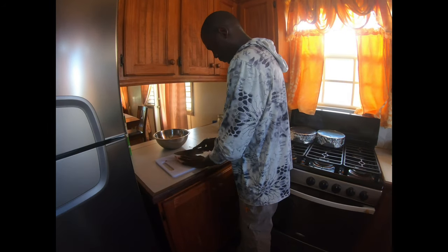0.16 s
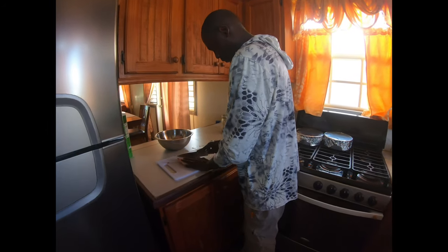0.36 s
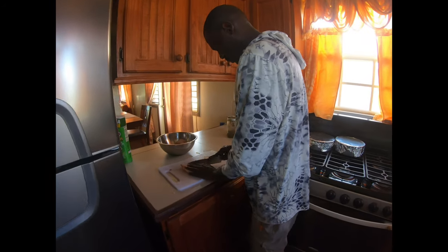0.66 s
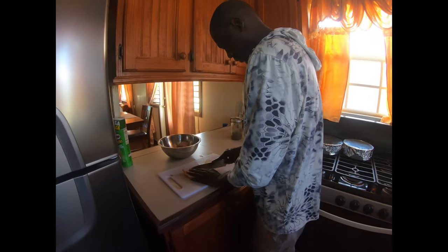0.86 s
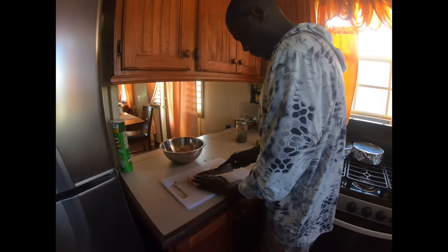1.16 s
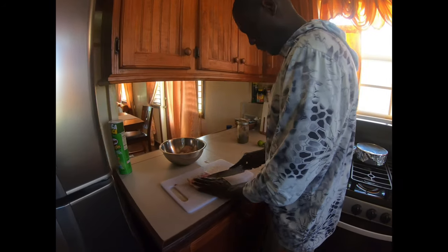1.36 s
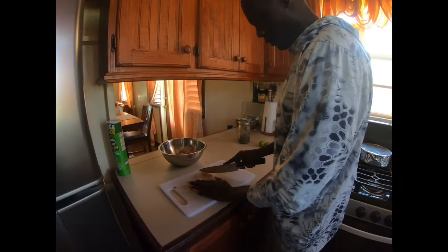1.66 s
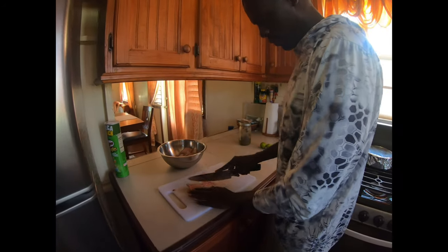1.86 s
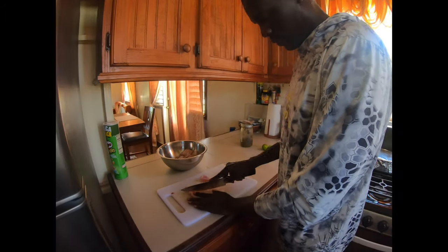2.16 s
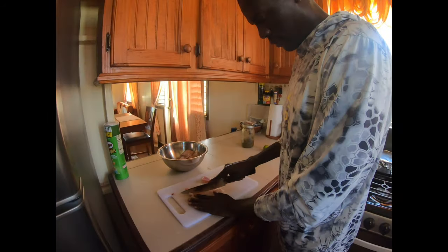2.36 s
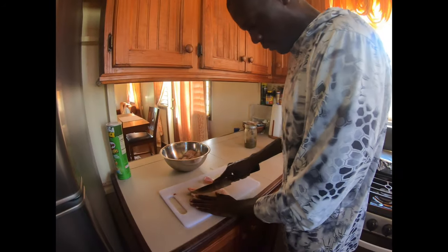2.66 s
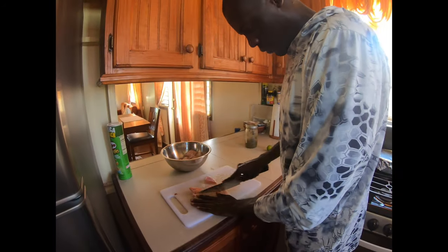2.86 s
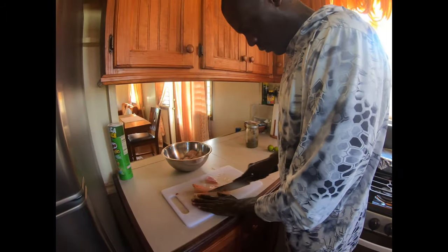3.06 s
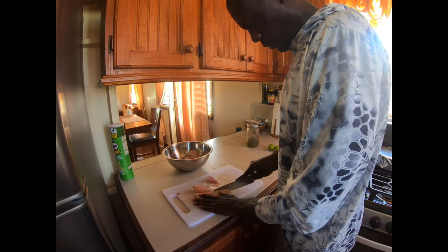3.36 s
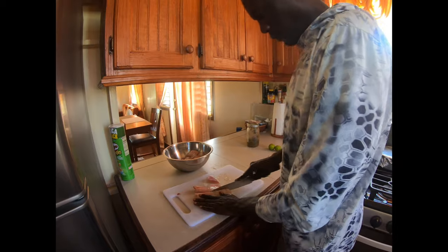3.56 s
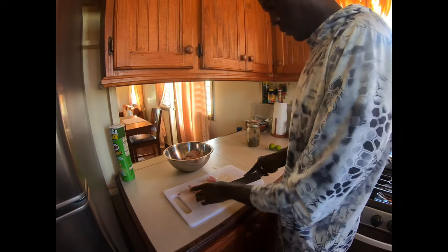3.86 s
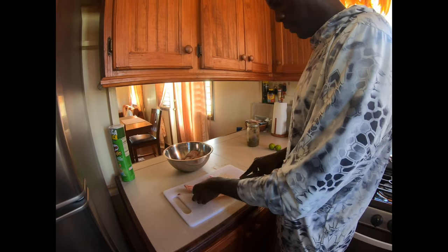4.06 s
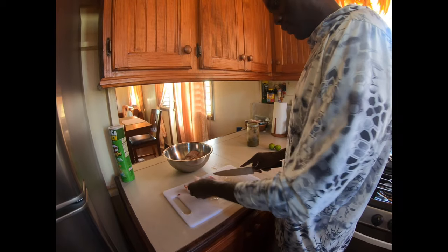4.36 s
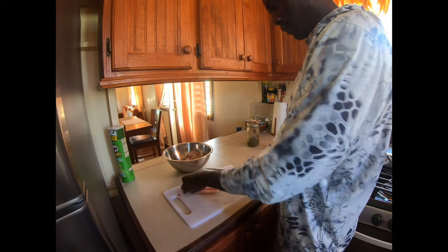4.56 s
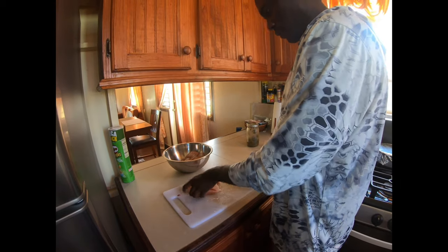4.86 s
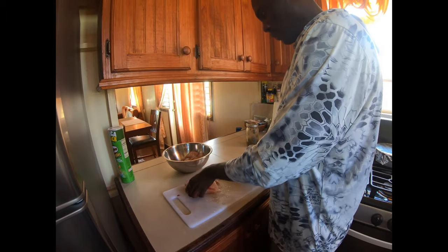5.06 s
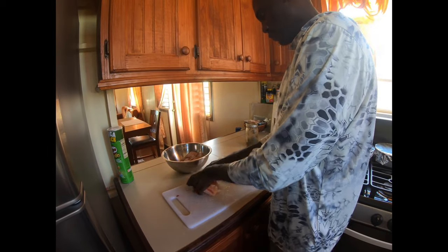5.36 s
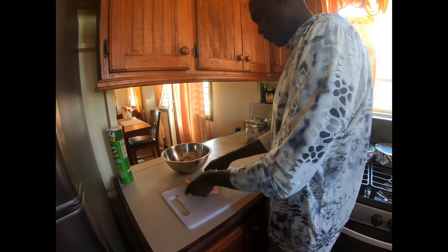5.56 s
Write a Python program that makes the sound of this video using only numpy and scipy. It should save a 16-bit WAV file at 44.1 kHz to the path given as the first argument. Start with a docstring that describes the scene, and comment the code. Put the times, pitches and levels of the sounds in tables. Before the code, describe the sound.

A low, slightly wavering fridge hum with soft air and faint thin hiss runs throughout, swelling during the first second or two as the carried microphone comes closer, with soft low handling bumps. A tiny squeak opens the scene, then a knife rasps through fish in short gritty strokes. Dull plastic-board taps land at about 0.8, 1.5 and 1.9 seconds, with a wet smack near 1.2. From 2.4 to 4 seconds the strokes come more closely, with a faint tap, small bone snaps and a crisp crunch around 3.1, and another strong rasp near 3.6. It then quiets, with a small moist tick at 4.6. Light steel clinks start at 4.85; at 5.07 the knife drops on the counter with the loudest, booming knock, bounces, jangles and skids, stopping by 5.2. A soft tap comes at 5.55. Short kitchen reflections surround the knife work.

```python
"""Slicing fish in a small kitchen

Fish is sliced on a plastic board while a fridge hums: a wavering tone with soft air noise and thin hiss.
The blade rasps through the flesh (clumps of tiny clicks), snaps small bones, smacks and taps the board
(short noise bursts and dying tones). Then the knife is put down: it clinks, drops on the counter
with a knock and skids a little. Echoes of the kitchen are added to all of the knife work."""
import sys
import numpy as np
from scipy import signal
from scipy.fft import rfft, irfft
from scipy.io import wavfile
from scipy.ndimage import uniform_filter1d

SR = 44100
rng = np.random.default_rng(int(sys.argv[2]) if len(sys.argv) > 2 else 0)


def generate_wav(signal):
    """Clip the signal to [-1, 1] and save it as 16-bit WAV at the path in sys.argv[1]."""
    frames = np.transpose(np.atleast_2d(signal))
    scaled = np.clip(frames, -1, 1) * 32767
    pcm = np.round(scaled).astype(np.int16)
    wavfile.write(sys.argv[1], SR, pcm)


N = 251811
TIME = np.arange(N) / SR
HIT_TIME = TIME[:SR // 2]  # every single hit lasts half a second


def amp(db):
    """Turns decibels into gain."""
    return 10 ** (np.asarray(db) / 20)


def evened(x):
    """Scales a steady sound to rms 1."""
    return x / np.sqrt(np.mean(x ** 2) + 1e-20)


def sized(x):
    """Scales a hit to the energy of a fortieth of a second at rms 1."""
    return x / np.sqrt(np.sum(x ** 2) * 40 / SR + 1e-20)


def read(points, hz):
    """Reads a curve between its points, on a log-frequency axis."""
    point_hz, value = np.transpose(points)
    return np.interp(np.log(hz + 1), np.log(point_hz), value)


def add(mix, start_s, sound):
    """Mixes a sound in at a time."""
    part = mix[round(start_s * SR):][:len(sound)]
    part += sound[:len(part)]


def causal(log_gain):
    """The minimum-phase spectrum with these log gains: it never sounds ahead of its cause."""
    return np.exp(np.conj(signal.hilbert(log_gain)))


def colour(x, points, tilt_db=0):
    """Filters a sound to a spectrum, tilted about 2 kHz by some dB per octave (level below 300 Hz)."""
    hz = abs(np.fft.fftfreq(4096, 1 / SR))
    gain_db = read(points, hz) + tilt_db * np.log2(np.maximum(hz, 300) / 2000)
    taps = np.fft.ifft(causal(np.log(amp(gain_db)))).real
    return signal.oaconvolve(x, taps[:len(taps) // 2])[:len(x)]


def neutral(x):
    """Keeps a burst's scatter in time but takes out its broad peaks and dips in pitch."""
    spectrum = np.fft.fft(x)
    power = uniform_filter1d(abs(spectrum) ** 2, size=25, mode="wrap")
    flatten = causal(-np.log(power + 1e-9 * power.max()) / 2)
    return sized(np.fft.ifft(spectrum * flatten).real)


def resonate(x, hz, width):
    """One resonance of some width in Hz, at rms 1."""
    pole = np.exp((2j * np.pi * hz - np.pi * abs(width)) / SR)
    return evened(signal.lfilter([1], [1, -pole], x).real)


def sweep(x, hz, width):
    """A broad resonance (two equal poles) that follows a pitch curve, at rms 1."""
    turn = np.exp(2j * np.pi * np.cumsum(hz) / SR)
    r = np.exp(-np.pi * abs(width) / SR)
    return evened((turn * signal.lfilter([1], np.poly([r, r]), x / turn)).real)


def drift(per_s):
    """Slow chance of rms 1, with no change faster than per_s cycles a second."""
    slow = np.fft.rfftfreq(N, 1 / SR) < per_s
    return evened(irfft(rfft(rng.standard_normal(N)) * slow, N))


def grains(per_s, spread_db, clump_db):
    """Stick-slip friction: tiny clicks of uneven size, louder and softer in clumps."""
    size = amp(spread_db * np.minimum(rng.exponential(1, N), 4) + clump_db * drift(60))
    return size * rng.choice([-1., 1.], N) * (rng.random(N) < per_s / SR)


def contact(t60, sharp, rise_s=0.00043):
    """Two things touch: a first sharp click and the brief chatter after it."""
    swell = 1 - np.exp(-HIT_TIME / rise_s)
    chatter = rng.standard_normal(len(HIT_TIME)) * swell * amp(-60 * HIT_TIME / t60)
    return neutral(sized(chatter) + sharp * sized(1. * (HIT_TIME == 0)))


def ring(modes):
    """The tones (modes) of a struck object; each dies away by 60 dB in its own t60."""
    tones = 0
    for hz, db, t60 in modes:
        fade = amp(db - 60 * HIT_TIME / t60)
        tones = tones + fade * np.sin(2 * np.pi * hz * HIT_TIME) * rng.choice([-1, 1])
    return sized(tones)


# how unlike left and right are: (frequency [Hz], side level against middle [dB])
STEREO_WIDTH = [(40, -14), (125, -8.5), (250, -17), (500, -9), (1000, -1.5), (2000, -5), (4000, -8),
                (8000, 0.5), (14000, -2)]


def pair(mid, side):
    """Two close ears: fairly alike in the bass, less alike in much of the treble."""
    width = amp(read(STEREO_WIDTH, np.fft.rfftfreq(len(side), 1 / SR)))
    side = irfft(rfft(side) * width, len(side))
    return np.array([mid + side, mid - side])


# how long the room rings: (frequency [Hz], time to die by 60 dB [s])
ROOM_RINGING = [(100, 0.32), (500, 0.21), (1400, 0.4), (3700, 0.26), (8000, 0.27), (14000, 0.19)]


def kitchen(x, wet_db, early_db, early_t60=0.058):
    """Direct sound, quick echoes from counter and cupboards, and a short tail that dies by frequency."""
    t = HIT_TIME
    shape = (2, len(t))
    echoes = rng.choice([-1., 1.], shape) * (rng.random(shape) < 3000 / SR) * (t > .0015)
    hz, age, z = signal.stft(echoes, SR, nperseg=256)
    fade = amp(-60 * age / read(ROOM_RINGING, hz)[:, None])
    tail = signal.istft(z * fade, SR, nperseg=256)[1][:, :len(t)]
    early = echoes * amp(-60 * t / early_t60)
    swell = np.minimum(t / 0.0026, 1)
    mid, side = [amp(wet_db) * sized(a * swell) + amp(early_db) * sized(b) for a, b in zip(tail, early)]
    mid = neutral(mid + sized(1. * (t == 0)))  # the direct sound is the single click at 0
    response = pair(mid, neutral(side)) / np.linalg.norm(mid)
    return signal.fftconvolve(x[None], response, axes=1)[:, :N]


# steady air of the kitchen: (frequency [Hz], relative level per Hz [dB])
AIR_COLOUR = [(20, -18.5), (42, -5), (70, -10), (115, -18), (155, 3), (215, -1.5), (260, -5), (380, -9.5),
              (520, -14), (1200, -20), (2200, -25), (4200, -30.5), (5500, -37.5), (8000, -41),
              (11000, -52.5), (15000, -63)]
# thin hiss of the fridge: (frequency [Hz], width of each of two filter passes [Hz], level at the start [dB])
HISS_BANDS = [(3750, 28, -74.5), (3820, 290, -91), (7050, 280, -78)]
AIR_DB = -53
HUM_HZ, HUM_DB = 196.7, -49.5  # the hum from near
HUM_FAR_DB, APPROACH_S = -14, 0.71  # how much weaker at first; time constant of the microphone coming closer


def fridge(waver=0.16, hiss_fade_db=-4):
    """A wavering hum that grows as the microphone comes near, soft air noise, and a thin hiss that fades."""
    hum = np.sqrt(2) * np.sin(2 * np.pi * HUM_HZ * TIME + waver * drift(5.8)) * (1 + waver * drift(3.7))
    hum *= amp(HUM_DB + HUM_FAR_DB * np.exp(-TIME / APPROACH_S))
    noise = rng.standard_normal((2, N))
    air = np.array([amp(AIR_DB) * evened(colour(z, AIR_COLOUR)) for z in noise])
    hiss = np.array([sum(amp(db) * resonate(resonate(z, hz, width), hz, width)
                         for hz, width, db in HISS_BANDS) for z in noise])
    return hum + pair(*(air + hiss * amp(hiss_fade_db * TIME / TIME[-1])))


# handling noise: (frequency [Hz], relative level per Hz [dB])
RUMBLE_COLOUR = [(20, -9), (42, 16), (70, -3.5), (110, -12), (250, -39), (1000, -79)]


def rumble(db=-66):
    """Soft uneven bumping of the carried microphone: low noise that swells at random."""
    swell = amp(3 * np.tanh(drift(5)))
    noise = rng.standard_normal((2, N))
    return amp(db) * swell * pair(*[evened(colour(z, RUMBLE_COLOUR)) for z in noise])


SWELL_CYCLES = 7.6  # time constant of a panel's swelling, in cycles of its tone


def panel(hz, t60, spread=0.132):
    """A panel swells up, the lower the slower, and dies as a cluster of close modes."""
    cluster = ring([(hz, 0, t60), (hz * (1 + spread), -7, t60), (hz * (1 - spread), -8, t60)])
    return sized(cluster * (1 - np.exp(-HIT_TIME * hz / SWELL_CYCLES)))


# cabinet under the counter, shaken by the drop: (frequency [Hz], level [dB], time to die by 60 dB [s])
CABINET_PANELS = [(40.7, -37.5, 0.36), (82.8, -37, 0.34), (112.5, -28.5, 0.4), (133.2, -27.5, 0.37),
                  (190, -28, 0.54), (291.3, -32, 0.11), (376, -34, 0.16)]
# soft low bumps as the microphone is carried: (time [s], level [dB])
MICROPHONE_BUMPS = [(.14, -45.5), (1.284, -48), (4.627, -44)]
DROP_S = 5.076  # when the knife's weight lands
TAP_THUD_DB, TAP_THUD_HZ, TAP_THUD_T60_S = -21, 109, 0.33  # counter under the board, dB against the tap
BUMP_HZ, BUMP_T60_S = 46, 0.084


def thuds():
    """The counter answers each tap, the cabinet booms under the dropped knife, the microphone is bumped."""
    out = np.zeros(N)
    for s, db, tilt_db in BOARD_TAPS:
        add(out, s, amp(db + TAP_THUD_DB) * panel(TAP_THUD_HZ, TAP_THUD_T60_S))
    add(out, DROP_S, sum(amp(db) * panel(hz, t60) for hz, db, t60 in CABINET_PANELS))
    for s, db in MICROPHONE_BUMPS:
        add(out, s, amp(db) * panel(BUMP_HZ, BUMP_T60_S))
    return out


# the hardest blow chatters this long; each step this much softer chatters twice as long
HARD_T60_S, SOFTER_DB = .011, 8.5


def knocks(blows, spectrum, modes, sharp, ring_db):
    """Hard blows: a crack of contact, longer for softer blows, and the ringing of what was struck."""
    out = np.zeros(N)
    hardest_db = max(db for s, db, tilt_db in blows)
    for s, db, tilt_db in blows:
        t60 = HARD_T60_S * 2 ** ((hardest_db - db) / SOFTER_DB)
        crack = sized(colour(contact(t60, sharp), spectrum, tilt_db))
        add(out, s, amp(db) * (crack + amp(ring_db) * ring(modes)))
    return out


# the blade touches down lightly: (time [s], level [dB], brightness [dB per octave])
KNIFE_CLINKS = [(4.8542, -39, 0.5), (4.8595, -37, 0.5), (4.930, -48.5, -5), (4.938, -54, -4),
                (4.950, -49, -1.5), (4.961, -49, -2.5)]
# sound of that contact: (frequency [Hz], relative level per Hz [dB])
CLINK_SPECTRUM = [(200, -4), (650, 2), (1000, -2.5), (1900, 2), (2700, 2), (3800, -6), (4800, -21),
                  (5650, -9.5), (6200, -28), (8000, -32), (10000, -56), (12000, -65)]
# the knife's ringing: (frequency [Hz], relative level [dB], time to die by 60 dB [s])
STEEL_MODES = [(952, 6.5, 0.079), (975, 9, 0.053), (1180, 5, 0.064), (1450, -5, 0.051), (1740, 5.5, 0.033),
               (1945, 5, 0.045), (2436, 0, 0.051), (2603, 3, 0.049), (2740, 2, 0.063), (2950, 0, 0.055),
               (3570, 4, 0.065), (3710, -3, 0.11), (4380, -5, 0.1), (5020, -21, .15), (5450, -9.5, 0.11),
               (5640, -8, 0.039), (6620, -21, 0.15), (7060, -17.5, 0.12), (7750, -19, 0.19),
               (8840, -26, 0.11), (10000, -33, 0.12)]


def clinks():
    """The blade clinks lightly down and its steel rings."""
    return knocks(KNIFE_CLINKS, CLINK_SPECTRUM, STEEL_MODES, sharp=0.41, ring_db=0)


# the knife drops flat and bounces: (time [s], level [dB], brightness [dB per octave])
DROP_BOUNCES = [(5.066, -40.5, -3.5), (5.0726, -28.5, 2), (5.0743, -23, 2), (5.079, -35.5, 1.5),
                (5.095, -34, -8), (5.107, -34.5, -10.5), (5.1161, -34.5, 1), (5.122, -37.5, -2.5),
                (5.152, -36, 9), (5.159, -37.5, 3.5), (5.1811, -37, 9), (5.206, -42, 11.5)]
# sound of that contact: (frequency [Hz], relative level per Hz [dB])
DROP_SPECTRUM = [(100, -4), (300, 7), (600, 2.5), (1100, 9), (2200, 1.5), (3100, -2), (4000, -4),
                 (4900, -13), (5700, -12.5), (6600, -19), (8000, -27), (10000, -57), (11000, -51),
                 (15000, -61)]
# knife and counter ringing together: (frequency [Hz], relative level [dB], time to die by 60 dB [s])
COUNTER_MODES = [(373, 1, 0.2), (528, 1.5, 0.17), (630, -3.5, 0.12), (760, 0, 0.19), (916, -18, 0.17),
                 (1075, 6.5, 0.12), (1115, 2.5, 0.13), (1258, -2, .18), (1543, -2, 0.1), (1660, -9, 0.17),
                 (2153, 3, 0.16), (2350, -9, 0.11), (2610, -9, 0.088), (2960, -16, .14), (3750, -7, 0.13),
                 (4480, -11, .12), (5160, -22, 0.12)]


def drop():
    """The knife drops flat and bounces; knife and counter ring together."""
    return knocks(DROP_BOUNCES, DROP_SPECTRUM, COUNTER_MODES, sharp=0.53, ring_db=-6.5)


BOUNCE_RING_DB, BOUNCE_RING_TILT = -18.5, 1.29  # dB against the blow; dB more per dB per octave of brightness
BOUNCE_RING_FALL_DB = 9  # higher modes are this much weaker per octave


def jangle(t60_stretch=0.81):
    """Each bounce rings the loose blade, brighter blows more; the tones die a little faster than in the skid."""
    out = np.zeros(N)
    modes = []
    for hz, width, db in BLADE_MODES:
        fall_db = BOUNCE_RING_FALL_DB * np.log2(hz / BLADE_MODES[0][0])
        t60 = t60_stretch * np.log(1000) / (np.pi * width)  # a narrow resonance rings long
        modes.append((hz, db - fall_db, t60))
    for s, db, tilt_db in DROP_BOUNCES:
        add(out, s, amp(db + BOUNCE_RING_DB + BOUNCE_RING_TILT * tilt_db) * ring(modes))
    return out


# scrape of the knife lying dull: (frequency [Hz], relative level per Hz [dB])
DULL_SCRAPE = [(80, -5), (200, -13), (520, 17), (1100, 2), (2500, -17), (4500, -13), (8000, -37),
               (15000, -60)]
# scrape of its edge: (frequency [Hz], relative level per Hz [dB])
KEEN_SCRAPE = [(500, 10), (1500, 2), (3700, -4), (5500, 3), (8200, 2.5), (10200, -3.5), (11000, -20),
               (14000, -16), (15000, -37)]
# whining of the loose blade: (frequency [Hz], width [Hz], relative level [dB])
BLADE_MODES = [(2480, 44, -1), (3755, 25, 3.5), (4480, 46, 3), (5060, 37, -2), (5330, 50, -5),
               (5440, 37, 4.5), (6250, 79, -10), (6650, 31, -1), (6970, 94, 1), (7700, 31, -2.5),
               (8820, 94, -3.5), (10230, 47, -7)]
# the knife gathers speed, slides and stops short
SKID_START_S, SKID_RISE_S, SKID_STOP_S, SKID_FALL_S, SKID_DB = 5.08, 0.049, 5.214, 0.0084, -37
KEEN_AFTER_S, KEEN_GAIN_DB = 0.15, 3  # time for the edge to take up the weight; how much louder it scrapes


def skid(whine_db=2, keen_share=0.78):
    """The knife rattles and slides to rest, scraping keener as the blade takes the weight; its edge whines."""
    age = TIME - SKID_START_S
    keen = np.clip(age / KEEN_AFTER_S, 0, 1) * keen_share
    stop = np.clip(1 - (TIME - SKID_STOP_S) / SKID_FALL_S, 0, 1)
    speed = np.clip(age / SKID_RISE_S, 0, 1) * stop
    slips = grains(per_s=1600, spread_db=5.0, clump_db=3.0)
    whine = evened(sum(amp(db) * resonate(slips, hz, width) for hz, width, db in BLADE_MODES))
    edge = evened(colour(evened(slips) + amp(whine_db) * whine, KEEN_SCRAPE))
    dull = evened(colour(slips, DULL_SCRAPE))
    return amp(SKID_DB) * speed * (amp(KEEN_GAIN_DB) * keen * edge + np.sqrt(1 - keen ** 2) * dull)


# the blade meets the board: (time [s], level [dB], brightness [dB per octave])
BOARD_TAPS = [(0.769, -31, 2.5), (1.534, -31.5, 1.5), (1.9087, -36, 0), (2.445, -47, -9.5), (5.555, -39, 0)]
# sound of that contact: (frequency [Hz], relative level per Hz [dB])
TAP_SPECTRUM = [(60, -21), (150, 0), (380, 7.5), (800, 3.5), (1350, 0), (1800, -15), (2250, -9.5),
                (2900, -17), (4500, -27), (6000, -34), (7300, -29.5), (10000, -45.5), (15000, -69)]
# ringing of the board: (frequency [Hz], relative level [dB], time to die by 60 dB [s])
BOARD_MODES = [(285, -5.5, 0.044), (397, -3, 0.035), (507, 18, 0.084), (786, 6.5, 0.1), (990, -3.5, 0.025),
               (1191, 7.5, 0.047), (1305, -16, 0.09)]
TAP_T60_S = 0.037  # how long the edge chatters on the board


def taps(ring_db=-9, give_s=0.00099):
    """The blade gets through and knocks the damped plastic board, which gives a little and softens the start."""
    out = np.zeros(N)
    give = 1 - np.exp(-HIT_TIME / give_s)
    for s, db, tilt_db in BOARD_TAPS:
        chatter = sized(colour(contact(TAP_T60_S, sharp=0.31), TAP_SPECTRUM, tilt_db))
        blow = chatter + amp(ring_db) * ring(BOARD_MODES)
        add(out, s, amp(db) * sized(blow * give))
    return out


SQUEAK_S, SQUEAK_LENGTH_S, SQUEAK_DB = 0.0067, 0.0055, -45  # middle; time from there to 1/e; level
SQUEAK_HZ, SQUEAK_RISE_HZ_PER_S, SQUEAK_OCTAVE_DB = 1502, 11000, -18


def squeak():
    """The wet blade squeaks once on the plastic: regular slips make a tiny rising chirp with its octave."""
    age = np.clip(TIME - SQUEAK_S, -.05, .05)
    phase = 2 * np.pi * np.cumsum(SQUEAK_HZ + SQUEAK_RISE_HZ_PER_S * age) / SR
    tone = np.sin(phase) + amp(SQUEAK_OCTAVE_DB) * np.sin(2 * phase)
    return amp(SQUEAK_DB) * np.exp(-(age / SQUEAK_LENGTH_S) ** 2) * tone


# wet flesh parts with a smack:
# (time [s], level [dB], brightness [dB per octave], peak frequency [Hz], time to die by 60 dB [s])
FLESH_SMACKS = [(1.1572, -44, -0.5, 6940, 0.01), (1.165, -38, -0.5, 6900, 0.045),
                (1.44, -57, 3.5, 8800, 0.089), (2.451, -54, 10, 6900, 0.13),
                (3.147, -55.5, 14, 7700, 0.097), (4.053, -61, 2.5, 7600, 0.11),
                (4.584, -50.5, 0, 6000, 0.016), (4.585, -53.5, 16, 12200, 0.0034),
                (4.5876, -47.5, 1.5, 5950, 0.014), (4.595, -52.5, 14, 7400, 0.065)]
SMACK_WIDTH_HZ, SMACK_PEAK_DB = 800, -11
SMACK_RISE = 0.13  # time constant of the swell, as a share of the smack's length


def smacks():
    """Wet flesh peels apart in bright bursts, some a quick tick, some a longer tear."""
    out = np.zeros(N)
    for s, db, tilt_db, hz, t60 in FLESH_SMACKS:
        burst = contact(t60, sharp=0.34, rise_s=SMACK_RISE * t60)
        peak = sized(resonate(burst, hz, SMACK_WIDTH_HZ))
        tear = sized(colour(burst, SNAP_SPECTRUM, tilt_db))
        add(out, s, amp(db) * sized(tear + amp(SMACK_PEAK_DB) * peak))
    return out


# small bones snap; where they meet the blade sets its pitch: (time [s], level [dB], pitch [Hz])
BONE_SNAPS = [(2.446, -47.5, 2480), (2.51, -54.5, 3650), (2.5536, -53, 3520), (2.743, -62.5, 4000),
              (2.925, -56, 2480), (2.928, -56.5, 5400), (3.085, -43, 2550), (3.093, -46, 3470)]
# sound of the crunch, and of the smacks: (frequency [Hz], relative level per Hz [dB])
SNAP_SPECTRUM = [(300, 7.5), (900, 1), (1600, 5), (2500, 6.5), (4500, 6.5), (7300, 8.5), (9500, -2),
                 (11000, -9.5), (13000, -16), (15000, -29)]
SNAP_T60_S, SNAP_TILT_DB = 0.016, -2  # length of the crunch; its brightness per octave


def snaps(ring_db=1, ring_t60=0.013):
    """A bone gives way with a short crunch, and the gripped blade rings for an instant."""
    out = np.zeros(N)
    for s, db, hz in BONE_SNAPS:
        crunch = sized(colour(contact(SNAP_T60_S, sharp=0.74), SNAP_SPECTRUM, SNAP_TILT_DB))
        add(out, s, amp(db) * (crunch + amp(ring_db) * ring([(hz, 0, ring_t60)])))
    return out


# strokes of the blade: (time of full speed [s], length [s], rasp level [dB],
# pressure on the board against the rasp [dB], pitch of the edge [Hz])
BLADE_STROKES = [(0.007, 0.1, -56, -6, 1560), (0.495, 0.32, -65, -23, 3150), (0.6, 0.052, -60.5, -8, 2980),
                 (0.669, 0.12, -52, -3, 3350), (0.71, 0.076, -54, 11.5, 1000), (0.851, 0.1, -57, 7.5, 2520),
                 (1.004, .1, -53.5, 4, 2100), (1.307, 0.084, -53.5, 1.5, 2700), (1.44, 0.26, -59, 2, 2840),
                 (1.703, 0.12, -65, 3, 2900), (2.494, 0.087, -53.5, 0, 3600), (2.605, 0.061, -51, -1, 2900),
                 (2.748, 0.14, -56.5, -12, 4200), (2.892, .1, -50.5, -4.5, 3130),
                 (3.103, 0.097, -45.5, -6, 2930), (3.44, 0.1, -55, -1, 2860), (3.621, 0.082, -46, -6, 3000),
                 (3.794, 0.2, -56, -6.5, 3480), (3.968, 0.089, -58, -3.5, 2560)]
# sound of the rasp: (frequency [Hz], relative level per Hz [dB])
RASP_COLOUR = [(500, -34), (1100, -11), (1450, 2.5), (1900, -0.5), (2450, 4.5), (2850, 1), (3550, -2.5),
               (4300, -1.5), (4900, -4), (5500, -4.5), (7400, -7.5), (10000, -47), (15000, -53)]
# sound of the pressed board: (frequency [Hz], relative level per Hz [dB])
PRESS_COLOUR = [(120, -25), (300, 6.5), (550, 9), (1100, 6), (1600, 1.5), (3000, -48), (8000, -64)]
# sound of the juice: (frequency [Hz], relative level per Hz [dB])
FIZZ_COLOUR = [(3000, -78), (6000, -25), (8000, 28.5), (10000, 26.5), (11000, 12.5), (13500, 16),
               (15000, -57)]
# resonances of the gripped blade: (frequency [Hz], width [Hz], relative level [dB])
GRIPPED_BLADE = [(2480, 180, -3), (2900, 240, -8), (3550, 180, 1), (4200, 300, -4), (5330, 130, -11)]
STROKE_RISE = 0.49  # share of a stroke spent speeding up
# juice fizzes this loud at this rasp level, and gains this many dB per dB of rasp
FIZZ_DB, FIZZ_AT_RASP_DB, FIZZ_FOLLOWS = -69.5, -51.5, 0.71
# the edge's broad resonance: dB against the rasp, width of each pole, rise in pitch over one stroke length
BITE_DB, BITE_WIDTH_HZ, BITE_OCTAVES = -5, 650, 0.28
BITE_FOLLOWS = 0.95  # below 1, it grows with speed more gently than the rasp
BITE_WANDER_OCTAVES, BITE_WANDER_PER_S = 0.15, 22  # pitch wanders as the point of contact shifts
SCRATCH_DB, SCRATCHES_PER_S = -8, 85  # fibres tick the blade: dB against the rasp, rate per resonance


def cutting(clump_db=-1.0):
    """The edge rasps, rising in pitch each stroke; fibres catch, pressure sounds the board, juice fizzes."""
    power = np.zeros((3, N))  # of rasp, press and fizz
    bite_power, bite_hz = np.zeros(N) + 1e-20, np.zeros(N)
    for s, length, db, pressure_db, hz in BLADE_STROKES:
        reach = length * np.where(TIME < s, STROKE_RISE, 1 - STROKE_RISE)
        speed = np.exp(-np.minimum(((TIME - s) / reach) ** 2, 60))
        fizz_db = FIZZ_DB + FIZZ_FOLLOWS * (db - FIZZ_AT_RASP_DB)
        power += speed * amp([[db], [db + pressure_db], [fizz_db]]) ** 2
        share = speed ** BITE_FOLLOWS * amp(db + BITE_DB) ** 2
        bite_power += share
        bite_hz += share * hz * 2 ** (BITE_OCTAVES * np.clip((TIME - s) / length, -1, 1))
    catch = evened(amp(clump_db * np.tanh(drift(70))))  # the edge catches and slips
    rasp, fizz = [evened(colour(grains(per_s=2200, spread_db=3.0, clump_db=2.5), shape))
                  for shape in (RASP_COLOUR, FIZZ_COLOUR)]
    press = evened(colour(grains(per_s=5000, spread_db=2.5, clump_db=1.5), PRESS_COLOUR))
    scratches = np.zeros(N)
    for hz, width, db in GRIPPED_BLADE:
        ticks = grains(per_s=SCRATCHES_PER_S, spread_db=2.5, clump_db=3.5)
        scratches += amp(db) * resonate(ticks, hz, width)
    rasp = evened(rasp + amp(SCRATCH_DB) * evened(scratches))
    # overlapping strokes share one pitch, weighted by their power
    pitch = bite_hz / bite_power * 2 ** (BITE_WANDER_OCTAVES * drift(BITE_WANDER_PER_S))
    slips = grains(per_s=1100, spread_db=1.5, clump_db=1.5)
    bite = np.sqrt(bite_power) * sweep(slips, pitch, BITE_WIDTH_HZ)
    return catch * (bite + np.sum(np.sqrt(power) * [rasp, press, fizz], axis=0))


def scene():
    """The knife work in the room, over the fridge; each spot on the counter has its own echoes."""
    background = fridge() + rumble()
    cabinet = pair(thuds(), amp(-24) * thuds())  # large panels reach both ears nearly alike
    put_down = kitchen(clinks(), wet_db=-5.5, early_db=-5)
    put_down += kitchen(drop() + jangle() + skid(), wet_db=-4, early_db=-2.5)
    board = kitchen(taps(), wet_db=-2.5, early_db=-4)
    slicing = kitchen(cutting() + squeak() + snaps() + smacks(), wet_db=-1.5, early_db=-3.5)
    return background + cabinet + put_down + board + slicing


# balance of the two ears: (frequency [Hz], left against right [dB])
EAR_BALANCE = [(100, 0), (500, -1.5), (1000, -1.5), (2000, -1), (4000, 0.56), (8000, -2.5), (12000, 3.5)]
EDGE_HZ = 15100  # little passes above this


def record(dry):
    """Left and right differ a little in colour; then the highest treble is cut off."""
    ears = []
    for x, sign in zip(dry, (1, -1)):
        ears.append(colour(x, [(hz, sign * db / 2) for hz, db in EAR_BALANCE]))
    low_pass = signal.firwin(301, EDGE_HZ, window=("kaiser", 9), fs=SR)
    return signal.oaconvolve(np.array(ears), low_pass[None], "same")


dry = scene()
out = record(dry)
generate_wav(out)
```